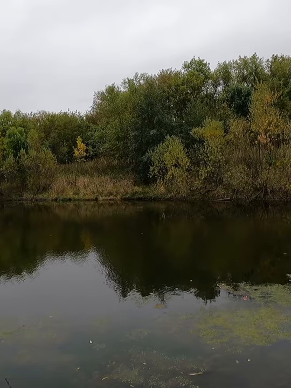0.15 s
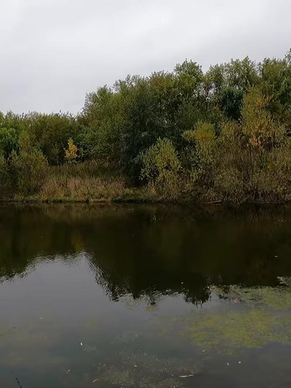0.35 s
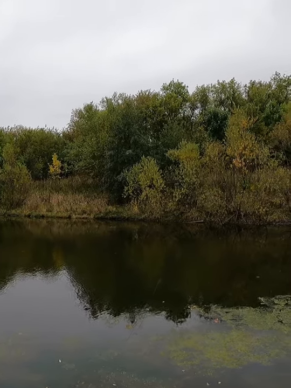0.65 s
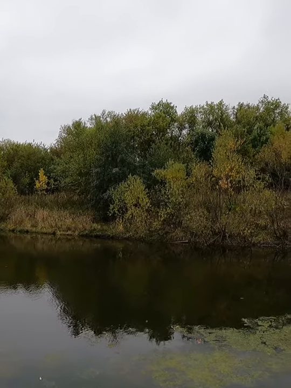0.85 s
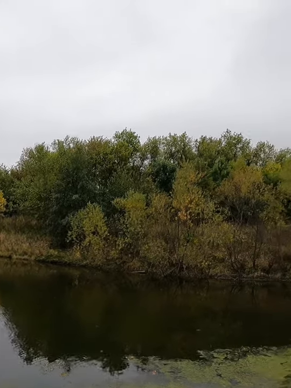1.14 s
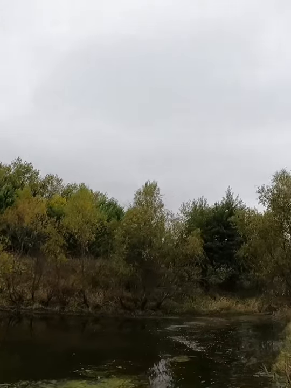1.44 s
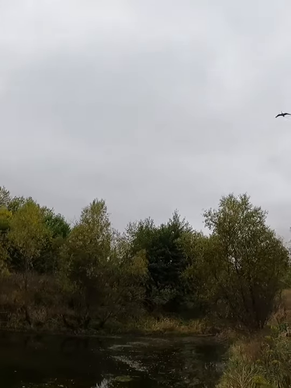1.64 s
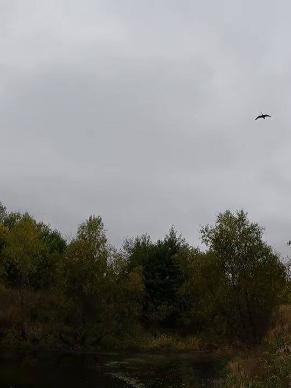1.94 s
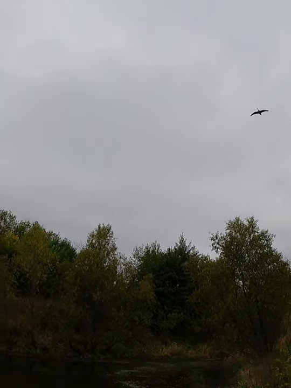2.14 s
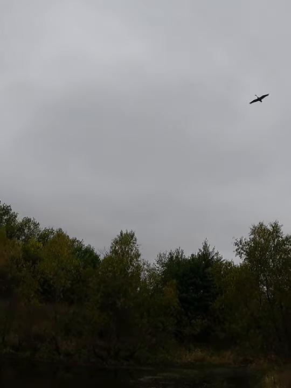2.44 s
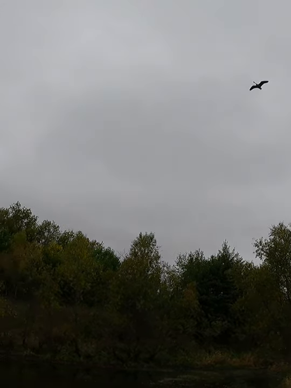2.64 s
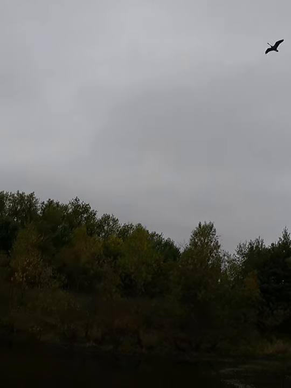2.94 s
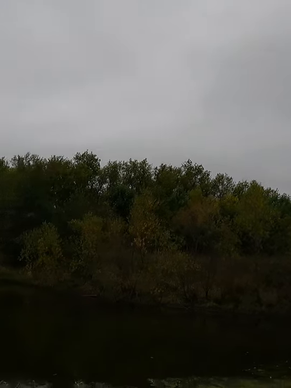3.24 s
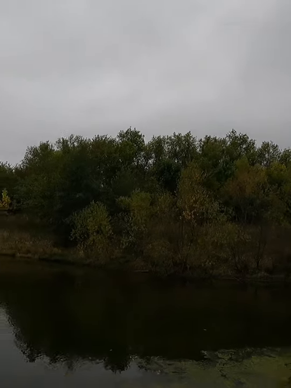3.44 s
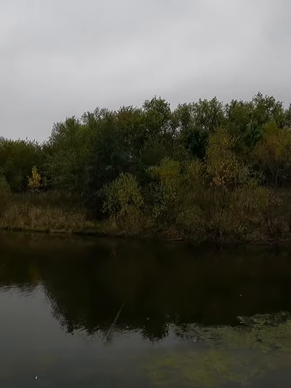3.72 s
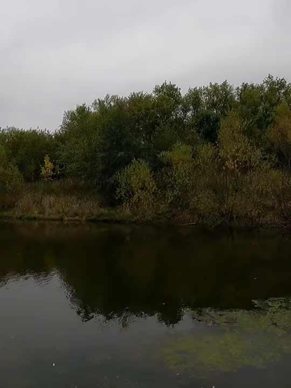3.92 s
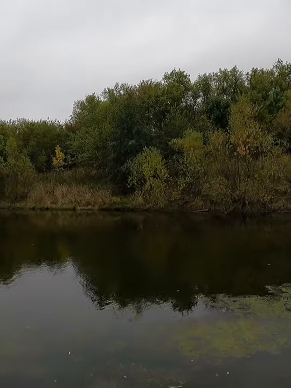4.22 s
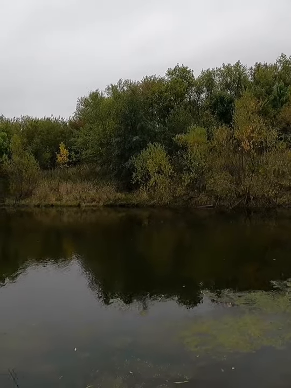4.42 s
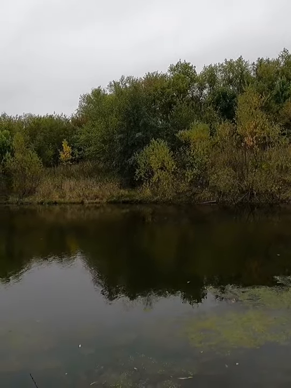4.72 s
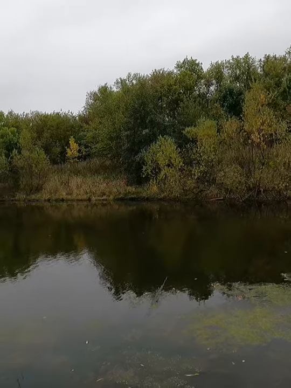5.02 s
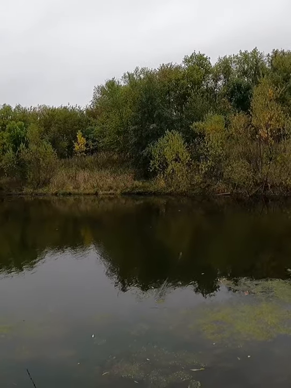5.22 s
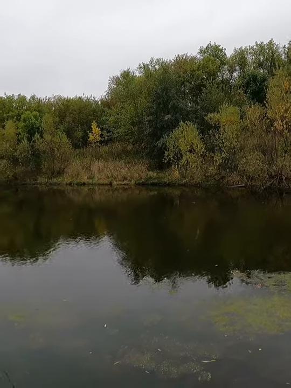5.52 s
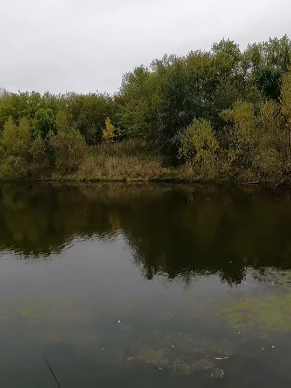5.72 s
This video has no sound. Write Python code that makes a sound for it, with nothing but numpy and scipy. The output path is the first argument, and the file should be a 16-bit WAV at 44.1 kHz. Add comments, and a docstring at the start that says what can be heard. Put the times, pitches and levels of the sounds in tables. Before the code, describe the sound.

A quiet pond with wooded banks, heard on a small handheld stereo microphone for about six seconds. Low distant traffic, soft leaf rustle and thin high cricket trills run throughout, with small low wind thumps, the strongest near 2.4 s. The fading ring of an earlier call hangs at the start. A goose then calls at about 0.25, 1.5, 2.8, 4.0 and 5.6 s. Each call lasts around a third of a second: a grunting, rattling croak that locks into a clear, brassy, nasal honk and sags at the end. Trees answer with dull, fluttering echoes. The bird drifts from near centre towards the left, the last call sounding farther off. A tiny dry tick comes at 1.3 s. A far engine climbs in pitch, shifts near 2.6 and 5.1 s, with faint motor hum. Leaves rustle more from 2.5 s, and very faint small-bird chips appear from 3.4 s onward.

```python
"""At a quiet pond with wooded banks, a goose flies over and honks five times.
Each honk starts as a rough croak of two pitches and locks into a clear stack of harmonics; filtered copies echo it.
Crickets are strings of short tones, a small bird's chips are husky tones, and a far engine climbs through three gears.
Shaped noise makes the wind on the microphone, the distant traffic, the rustling trees and one small tick."""
import sys
import numpy as np
from scipy import signal
from scipy.fft import rfft, irfft, next_fast_len
from scipy.io import wavfile
from scipy.ndimage import uniform_filter1d, map_coordinates

SR = 44100
rng = np.random.default_rng(int(sys.argv[2]) if len(sys.argv) > 2 else 0)


def persist_wave(psi):
    """Save psi, clipped to +-1, as 16-bit WAV."""
    counts = np.round(np.clip(psi, -1, 1) * 32767).astype(np.int16)
    wavfile.write(sys.argv[1], SR, np.atleast_2d(counts).T)


N = 258867
TIME = np.arange(N) / SR  # seconds

# How the throat colours the croak and the breath in the honk. Each row: frequency in Hz, relative level in dB.
CROAK_COLOUR = [(200, -58), (390, -17), (520, -16), (720, -11), (1000, -1), (1300, 6.5), (1550, -4.5),
                (2000, 2.5), (2700, -10), (3800, -6.5), (5800, -2.5), (8000, -19), (13000, -42.5)]
# The bird's path. Each row: time in seconds, left minus right level in dB, extra level sent to the trees in dB.
FLIGHT_PATH = [(.5, -0.3, 7.5), (1.7, -2.5, 0), (2.9, 0.8, 2), (4.2, 2.5, 2.5), (5.8, 5, 14)]


def amp(db):
    """Turn decibels into a plain multiplier."""
    return 10 ** (np.asarray(db) / 20)


def unit(x):
    """Scale a sound to an rms of 1."""
    return x / np.sqrt(np.mean(x ** 2) + 1e-20)


def along(points, hz):
    """Read a curve of (Hz, value) points on a logarithmic frequency axis."""
    f, v = np.transpose(points)
    return np.interp(np.log(hz + 1), np.log(f + 1), v)


def curves(rows, t=TIME):
    """Read each column after the time column at the times t."""
    s, *columns = np.transpose(rows)
    return [np.interp(t, s, column) for column in columns]


def span(start, end):
    """Find the samples between two times."""
    return np.flatnonzero((TIME >= start) & (TIME <= end))


def bell(t, width):
    """A smooth bump of height 1 at t = 0."""
    return np.exp(-(t / width) ** 2)


def ramp(t, length):
    """A straight rise from 0 at t = 0 to 1."""
    return np.clip(t / length, 0, 1)


def wobble(rate, size=N):
    """A smooth random curve with a new random point rate times a second."""
    points = rng.standard_normal(int(size * rate / SR) + 4)
    return map_coordinates(points, [np.arange(size) * rate / SR], mode="nearest")


def angle(hz):
    """Add up a changing frequency into the running phase of an oscillator."""
    return 2 * np.pi * np.cumsum(hz) / SR


def filtered(x, response):
    """Multiply the spectrum of x by a response that depends on frequency."""
    n = x.shape[-1]
    padded = next_fast_len(n + 8192)
    return irfft(rfft(x, padded) * response(np.fft.rfftfreq(padded, 1 / SR)), padded)[..., :n]


def rush(spectrum):
    """Stereo noise of rms 1 with a given spectrum; its low sounds are more alike left and right."""
    # Each row: frequency in Hz, left-right likeness (1 is identical).
    likeness = [(30, 0.71), (90, 1), (400, 0.78), (1200, 0.37), (3000, 0.27), (5200, 0.43), (10000, 0.44)]

    def turn(hz):
        return np.arccos(np.clip(along(likeness, hz), -1, 1)) / 2

    def response(hz):
        return amp(along(spectrum, hz)) * [np.cos(turn(hz)), np.sin(turn(hz))]

    mid, side = filtered(rng.standard_normal((2, N)), response)
    return unit(np.array([mid + side, mid - side]))


def place(x, pan_db, lag):
    """Put a source between two microphone ports; the left one hears it later by lag samples."""
    shifted = filtered(x, lambda hz: np.exp(np.outer([-1, 1], 1j * np.pi * hz * lag / SR)))
    return shifted * amp([[pan_db / 2], [-pan_db / 2]])


def engine(waver_db=3.0):
    """A far engine pulls, shifts up and pulls again; only two low orders carry, as tones that follow the revs."""
    # Each row: start in seconds, length in seconds, starting firing frequency in Hz, climb in Hz per second,
    # base level of the firing tone in dB, base level of the tone at 1.5 times that frequency in dB.
    gears = [(-.3, 3.05, 114, 15.3, -52, -56), (2.602, 2.52, 108.3, 17.5, -41.5, -58),
             (5.094, 1.2, 101, 4.4, -46, -58)]
    clutch_s, load_db_per_hz = 0.12, 0.18  # fade at a shift; the firing tone is louder at higher revs
    lift_hz, lift_s = 26.7, 0.2117  # the revs drop as the throttle lifts
    out = np.zeros(N)
    for start, length, start_hz, climb, firing_db, half_db in gears:
        age = np.clip(TIME - start, 0, length)
        hz = start_hz + climb * age - lift_hz * bell(length - age, lift_s)
        phase = angle(hz * (1 + 0.0063 * wobble(18)))
        load = ramp(age, clutch_s) * ramp(length - age, clutch_s)
        revs_db = load_db_per_hz * (hz - start_hz - climb * length / 2)
        firing = amp(firing_db + revs_db + waver_db * wobble(11)) * np.sin(phase)
        half_order = amp(half_db + waver_db * wobble(11)) * np.sin(phase + phase / 2)
        out += load * (firing + half_order)
    return np.sqrt(2) * out


def whine(spread_rate=28):
    """Far motors hum on steady tones, smeared by the long way through the wood."""
    # Each row: frequency in Hz, base level in dB.
    motor_tones = [(505, -60.5), (670, -58), (1025, -57)]
    # Each row: time in seconds, level change of all the tones in dB.
    swell = [(2.2, -10.5), (2.6, 3), (3.4, -4.5), (5.87, -7)]
    total = 0
    for hz, db in motor_tones:
        phase = 2 * np.pi * hz * TIME
        total = total + amp(db) * (wobble(spread_rate) * np.sin(phase) + wobble(spread_rate) * np.cos(phase))
    return total * amp(curves(swell)[0])


def air(drone_db=-43):
    """Wind pushes on the ports, traffic drones far off and trees rustle softly, all made of shaped noise."""
    # Puffs of wind. Each row: time in seconds, added level in dB, half-length in seconds.
    gusts = [(0, -41, 0.083), (0.294, -34.5, 0.05), (1.369, -38.5, 0.05), (1.74, -37, 0.13),
             (1.99, -37.5, 0.057), (2.39, -27.5, .026), (2.747, -43.5, 0.22), (3.62, -44.5, 0.17),
             (4.79, -41, 0.035), (5.36, -33.5, 0.083), (5.8, -41.5, 0.26)]
    # Sound of wind on the ports. Each row: frequency in Hz, relative level in dB.
    buffet = [(15, 1), (35, 1.5), (70, -2), (110, -6.5), (200, -47.5), (500, -53), (1500, -110)]
    # Sound of distant traffic. Each row: frequency in Hz, relative level in dB.
    traffic = [(25, -42.5), (60, -2.5), (95, -3.5), (150, -8), (230, -15), (330, -21.5), (600, -34.5),
               (1500, -57), (4000, -94.5)]
    # Loudness of the leaves. Each row: time in seconds, rustle level in dB before a small waver.
    leaf_level = [(0, -55.5), (1.2, -55), (2.1, -57), (2.5, -50), (3.2, -49.5), (3.7, -48), (4.4, -49.5),
                  (5, -54), (5.87, -53.5)]
    # Sound of the leaves. Each row: frequency in Hz, relative level in dB.
    leaf_colour = [(100, -19), (450, 1), (750, -4), (1050, 0.5), (1700, -7.5), (2500, -15), (3800, -22),
                   (7000, -32.5), (13000, -57)]
    breeze = amp(-48 + 4 * wobble(4))  # the light air between the puffs
    wind = breeze + sum(amp(db) * bell(TIME - s, half) for s, db, half in gusts)
    drone = amp(drone_db + 1.3 * wobble(3.734)) * rush(traffic)
    rustle = amp(curves(leaf_level)[0] + 0.86 * wobble(6.7)) * rush(leaf_colour)
    return wind * rush(buffet) + drone + rustle


def cricket(rows, rate, hz, sweep, duty, rough_db, drift_db=-0.7):
    """Each wing stroke is a short tone that sags in pitch as the wing slows."""
    cycle = (angle(rate * (1 + 0.0045 * wobble(6))) / (2 * np.pi)) % 1
    stroke = cycle / np.clip(duty, .1, 1)  # past 1 the wing is silent
    loud = np.sin(np.pi * np.minimum(stroke, 1)) * amp(rough_db * wobble(50) + drift_db * wobble(4.2))
    tone = np.sin(angle(hz * (1 - sweep * (stroke - .5) + .008 * wobble(300))))
    return unit(loud * tone) * amp(curves(rows)[0])


def insects(chorus_db=-58):
    """Three near crickets trill as pulsed tones in front of a noisy chorus of far ones."""
    # A nearly steady cricket. Each row: time in seconds, level in dB.
    fast_level = [(0, -58), (5.87, -59)]
    # A cricket that fades away and returns. Each row: time in seconds, level in dB.
    slow_level = [(1.3, -60), (2.5, -90.5), (4.1, -60), (5.87, -63)]
    # A tree cricket that swells once. Each row: time in seconds, level in dB.
    tree_level = [(.9, -79), (1.4, -68), (3.2, -65), (4, -81)]
    # Sound of the far crickets. Each row: frequency in Hz, relative level in dB.
    chorus_colour = [(2500, -15), (3900, -18.5), (4500, -11.5), (4900, -3.5), (5300, -7.5), (5600, -5),
                     (5900, -8.5), (6300, -19), (8000, -27.5), (12000, -31), (13500, -48.5)]
    # rate is in strokes per second
    fast = cricket(fast_level, rate=65.2, hz=5236, sweep=0.13, duty=0.6, rough_db=1.6)
    slow = cricket(slow_level, rate=54.4, hz=5160, sweep=0.27, duty=0.93, rough_db=2.0)
    tree = cricket(tree_level, rate=51, hz=2890, sweep=0.0099, duty=0.48, rough_db=2.5)
    near = place(fast + tree, pan_db=-2.0, lag=0.45) + place(slow, pan_db=-7, lag=.4)
    return near + amp(chorus_db + 0.5 * wobble(16.0)) * rush(chorus_colour)


def earlier_echo(db=-57, hz=1380, t60=3.9):
    """A wavering tone dies away, as if the trees still rang with a previous honk."""
    waver = wobble(45) + .4 * np.array([wobble(45), wobble(45)])
    return amp(db - 60 * TIME / t60) * waver * np.sin(2 * np.pi * hz * TIME)


def croak(age, upper_hz, lower_hz, joins, lower_share, jitter, hiss_db=-23):
    """Two membranes at different pitches chop the same airflow, which rattles at their difference."""
    # Each row: time from the start in seconds, upper pitch as a ratio.
    upper_glide = [(0, 1), (.018, 1), (.028, 1.15), (.07, .99), (.15, 0.78)]
    # Air hissing through the croak. Each row: frequency in Hz, relative level in dB.
    turbulence = [(500, -22.5), (1500, -13), (2200, -3.5), (3000, -10.5), (4300, 4), (6000, 0), (7500, -16),
                  (9000, -22.5), (13000, -37)]
    both = np.clip((age - joins) / .012 + .5, 0, 1)  # 1 once the lower membrane has joined
    upper_jitter = jitter * (0.17 + 1.29 * both) * wobble(305.4, len(age))
    upper = angle(upper_hz * curves(upper_glide, age)[0] * (1 + upper_jitter))
    lower = angle(lower_hz * (1 + jitter * wobble(220, len(age))))
    share = lower_share * both * amp(2 * wobble(160, len(age)))
    swing = (np.sin(upper) + share * np.sin(lower)) / np.sqrt(1 + share ** 2)
    # air passes only near the top of the swing, and with some turbulence
    roughness = 1 + .11 * (.5 + .5 * both) * rng.standard_normal(len(age))
    flow = np.maximum(swing - .2, 0) * roughness
    voice = unit(filtered(flow - flow.mean(), lambda hz: amp(along(CROAK_COLOUR, hz))))
    # the pressure behind the membranes is steady: the voice rattles from beat to beat but keeps its strength
    strength = np.sqrt(np.abs(uniform_filter1d(voice ** 2, size=420)) + .02)
    breath = rng.standard_normal(len(age)) * (1 + swing / 2)
    hiss = unit(filtered(breath, lambda hz: amp(along(turbulence, hz))))
    return unit(voice / strength) + amp(hiss_db) * hiss


def croak_effort(age, lead, grunt_s, grunt_db, trough_db, swell_db):
    """A short grunt, a trough, then a steady swell until the honk takes over, lead seconds after the start."""
    grunt_rise_s, grunt_fall_s = 0.007, 0.0052
    overlap_s, handover_s = 0.004, 0.03  # the croak lasts into the honk, then gives way
    swelling_db = trough_db + (swell_db - trough_db) * ramp(age - grunt_s, lead - grunt_s)
    db = grunt_db + (swelling_db - grunt_db) * ramp(age - grunt_s, grunt_fall_s)
    return amp(db) * ramp(age, grunt_rise_s) * (1 - ramp(age - lead - overlap_s, handover_s))


def honk(t, row, jitter=0.0034, drift=0.0026, flutter_db=5, flutter_rate=42, rasp_db=-32, settle=0.02,
         rattle=0.41, dulling_db=-14, port_phase=0.32, count=21):
    """Both membranes locked on one pitch: a stack of harmonics, the second on the main throat resonance."""
    # How the throat colours the tone. Each row: frequency in Hz, relative level in dB.
    throat = [(650, -2), (1300, 4.5), (2000, -7), (2650, -17), (3300, -8.5), (4000, -1), (5200, -5),
              (6200, -9.5), (7400, -11), (8300, -25), (10500, -30.5), (13000, -38.5), (14500, -65)]
    # Overtones near one pitch fade or swell in mid-honk.
    # Each row: time in seconds, frequency in Hz, change in dB, half-length in seconds.
    fades = [(1.682, 3430, -11, 0.049), (1.691, 4030, -10, 0.023), (1.784, 2040, 5.5, 0.038),
             (1.797, 1360, -10.5, 0.028), (2.937, 2080, -23, 0.021), (4.084, 1290, 7, 0.013),
             (4.132, 1320, -5.5, 0.04), (4.137, 3960, -11, 0.012), (4.219, 1300, 2.5, 0.012),
             (4.223, 2230, -16, 0.032), (5.832, 4100, -31, .012)]
    fade_width_hz = 270
    scoop_s, sag_hz = 0.02195, 65.6  # the pitch settles at first, and sags as the air runs out
    attack_s, attack_db = 0.011, -4  # the level rises from this far down
    release_s, release_db = .016, -15.5  # the tone dies
    brightening_s, dulling_s = .02, 0.031  # overtones arrive after the tone and go sooner
    linger_db = 16  # lift of the fundamental as the overtones die
    (start, length, pitch_hz, glide, scoop_hz, sag_s, hold_db,
     low_db, low_fade_db, third_db, blare_db, edge_db, top_db) = row
    age, left, from_middle = t - start, start + length - t, t - start - length / 2
    pitch = pitch_hz + glide * from_middle - scoop_hz * np.exp(-age / scoop_s) - sag_hz * bell(left, sag_s)
    db = hold_db + attack_db * bell(age, attack_s) + release_db * bell(left, release_s)
    loose = bell(age, settle)  # the croak's rattle lingers until the membranes lock
    slack_db = dulling_db * (bell(age, brightening_s) + bell(left, dulling_s))  # overtones need full pressure
    slow_drift = drift * wobble(35.7, len(t))
    quick_jitter = (jitter + .04 * loose) * wobble(400, len(t))
    phase = angle(pitch * (1 + slow_drift + quick_jitter))
    fundamental_db = low_db + low_fade_db * from_middle + linger_db * bell(left, release_s)
    tone = np.zeros((2, len(t)))
    for k in range(1, count + 1):
        hz = k * pitch
        upper = along([(1350, 0.13), (3100, 0.91)], hz)
        edge = along([(4200, 0.12), (4600, 1.0)], hz)
        overtone_db = upper * ((1 - edge) * blare_db + edge * edge_db + slack_db)
        effort_db = fundamental_db if k == 1 else overtone_db
        beak_db = third_db * (k == 3) + top_db * along([(6000, 0.011), (7500, 0.86)], hz)
        fade_db = sum(depth_db * bell(t - s, half) * bell(hz - at_hz, fade_width_hz)
                      for s, at_hz, depth_db, half in fades)
        # each overtone wavers at random, a little differently at each port
        flutter = flutter_db * np.minimum(wobble(flutter_rate, len(t)), .7)
        ports = np.array([wobble(30.1, len(t)), wobble(30, len(t))])
        waver_db = np.clip((k - 2) / 2, .15, 1) * (flutter + 2.6 * ports)
        level = amp(db + along(throat, hz) + effort_db + beak_db + fade_db + waver_db)
        tone += level * np.sqrt(2) * np.sin(k * phase + port_phase * ports + rng.uniform(0, 2 * np.pi))
    breath = rng.standard_normal(len(t)) * (1 + np.cos(phase))
    hiss = unit(filtered(breath, lambda hz: amp(along(CROAK_COLOUR, hz)) / (1 + hz / 7000)))
    beats = 1 + rattle * loose * np.sin(phase / 4)
    ends = ramp(age, .01) * ramp(left, .004)
    return ends * beats * (tone + amp(db + rasp_db) * hiss)


def goose():
    """Five calls, each a croak that locks into a honk, while the bird moves from right of centre to the left."""
    # The rough start of each call. Each row: start in seconds, grunt length in seconds, grunt level in dB,
    # trough level in dB, level reached at the honk in dB, upper membrane in Hz before its glide,
    # lower membrane in Hz, seconds until the lower one joins, its base strength, base pitch jitter.
    croak_rows = [(.241, 0.024, -33.5, -43.5, -33, 635, 505.5, .035, 1.4, .03),
                  (1.47, 0.019, -27, -38, -23.5, 622, 525, .04, 0.9945, 0.0393),
                  (2.766, .036, -32, -38.5, -33.5, 662, 462, 0.0075, 3.7, 0.028),
                  (3.986, 0.044, -28.5, -31.5, -24.5, 610, 513.7, 0.0086, 1.8, .065),
                  (5.627, .041, -38, -52, -29.5, 610, 432.4, 0.0032, 1.42, .05)]
    # The clear part. Each row: start in seconds, length in seconds, pitch in Hz, glide in Hz per second,
    # scoop up to the pitch in Hz, length of the final sag in seconds, base level in dB, then against it:
    # fundamental in dB, its change in dB per second, third harmonic in dB, blare below about 4.4 kHz in dB,
    # edge above it in dB, extra toward 7 kHz and above in dB (the last three are phased in by frequency).
    honk_rows = [(0.356, 0.2, 689.2, 150, 28, .024, -26.5, -14, -65, 7, -25.5, -34, 5),
                 (1.621, 0.23, 675, 72, 3.93, .026, -20, -16, -17, -3, -24.5, -22.5, 0),
                 (2.839, .164, 697.7, -60, 81, .027, -21, -12, -84, 7, -24, -19, -7.5),
                 (4.061, 0.2394, 658.3, -29.5, 47.3, 0.021, -24, -9, -56, -1, -9, -14.5, -8.5),
                 (5.737, 0.23, 643.3, -120, 40, 0.02, -28, -6.5, -7, -7.5, -10.5, -23.5, 4)]
    voice = np.zeros((2, N))
    for (start, grunt_s, grunt_db, trough_db, swell_db, *syrinx), row in zip(croak_rows, honk_rows):
        lock, length = row[:2]
        rough = span(start, lock + 0.034)  # until the croak has given way
        clear = span(lock, lock + length)
        age = TIME[rough] - start
        effort = croak_effort(age, lock - start, grunt_s, grunt_db, trough_db, swell_db)
        voice[:, rough] += croak(age, *syrinx) * effort
        voice[:, clear] += honk(TIME[clear], row)
    pan_db, _ = curves(FLIGHT_PATH)
    return place(voice, 0, lag=0.65) * amp(np.outer([.5, -.5], pan_db))


def banks(x, far_db=-25, near_t60=0.22, build=0.17):
    """The near bank answers at once; the trees across the water swell later and die slowly."""
    # Each row: frequency in Hz, time for the far echo to die by 60 dB in seconds.
    far_t60 = [(300, .8), (700, 0.53), (1350, 1.82), (2100, 1.3), (4000, 0.56), (7500, 1.07), (12000, 0.15)]
    hz, t, z = signal.stft(rng.standard_normal((3, 2 * SR)), SR, nperseg=256)

    def tail(shape):
        shared, left, right = signal.istft(z * shape, SR, nperseg=256)[1]
        return unit(np.array([shared + 1.4 * left, shared + 0.82 * right])) / np.sqrt(len(shared))

    colour_db = along([(400, -3.5), (1350, -0.5), (2200, 4.5), (4000, 13.0), (8000, 6.5), (14000, -22.5)], hz)
    colour = amp(colour_db)[:, None]
    near = amp(-27) * tail(amp(-60 * t / near_t60) * (1 - np.exp(-t / .02)) * colour)
    far = tail(amp(-60 * t / along(far_t60, hz)[:, None]) * (1 - np.exp(-t / build)) * colour)
    return signal.fftconvolve(x.mean(0)[None], near + amp(far_db) * far, axes=1)[:, :N]


def tree_lines(x):
    """Single rows of trees throw back dull, separate echoes: delayed copies with a wavering level."""
    out = np.zeros((2, N))
    # delay in seconds, base level in dB, left minus right level in dB
    for delay, db, pan_db in [(.21, -31.5, 1.5), (.34, -41.5, 5), (.52, -40.5, 27), (.78, -43, 21)]:
        delayed = np.interp(TIME - delay, TIME, x.mean(0), left=0)
        waver = amp(6.3 * np.minimum(wobble(40), .8))
        out += amp(db) * place(delayed * waver, pan_db, lag=0)
    dull_db = [(600, -5.0), (1350, -6.0), (2200, -4.5), (4500, -12.5), (9000, -33.0)]
    return filtered(out, lambda hz: amp(along(dull_db, hz)))


def tick(s=1.302, db=-45, t60=.025):
    """One small dry tick on the shore: a burst of shaped noise that dies at once."""
    age = np.maximum(TIME - s, 0)
    colour_db = [(300, -5), (1400, -1.5), (2200, -10.5), (3300, 5), (3900, -32), (7000, -55)]
    return (TIME > s) * amp(db - 60 * age / t60) * rush(colour_db)


def small_bird(db=-8, length=0.027, husk_rate=450):
    """Faint chips from the bushes: tones made husky by quick random changes, blurred by the leaves."""
    # Each row: start in seconds, level in dB before the shared change db, pitch in Hz.
    chips = [(3.4394, -60, 3060), (3.5583, -57, 3300), (4.66, -54.5, 3220), (4.9636, -52, 3210),
             (5.2111, -56, 3130), (5.4575, -56, 3230)]
    out = np.zeros(N)
    for s, chip_db, hz in chips:
        swell = bell(TIME - s - .01, length)
        phase = 2 * np.pi * hz * TIME
        husky = wobble(husk_rate) * np.sin(phase) + wobble(husk_rate) * np.cos(phase)
        out += amp(chip_db + db) * swell * husky
    return place(out, pan_db=4, lag=.4)


def scene():
    """The goose and its echoes join the pond's insects, small bird, wind and far machines."""
    calls = goose()
    _, aim_db = curves(FLIGHT_PATH)
    outward = calls * amp(aim_db)
    far = place(engine() + whine() + air(), pan_db=0, lag=1)
    echo = banks(outward) * amp(3.8 * np.minimum(wobble(28), .8))  # the long echo flutters
    return calls + echo + tree_lines(outward) + earlier_echo() + insects() + small_bird() + tick() + far


def record(dry):
    """Keep only the sound below 14.2 kHz."""
    return filtered(dry, lambda hz: hz < 14200)


dry = scene()
out = record(dry)
persist_wave(out)
```